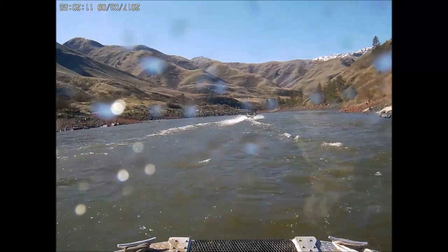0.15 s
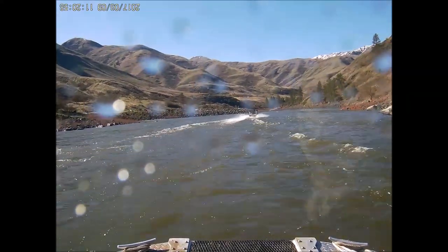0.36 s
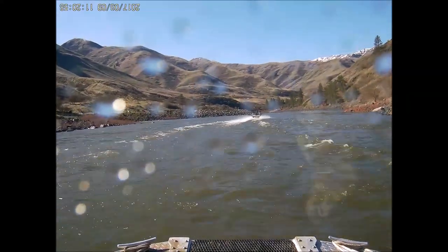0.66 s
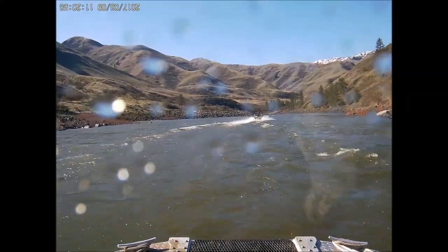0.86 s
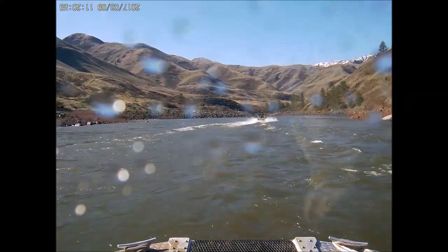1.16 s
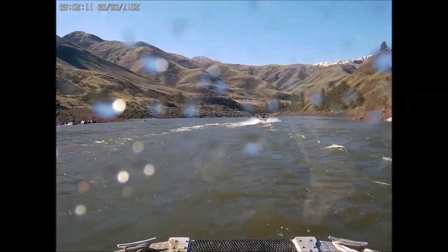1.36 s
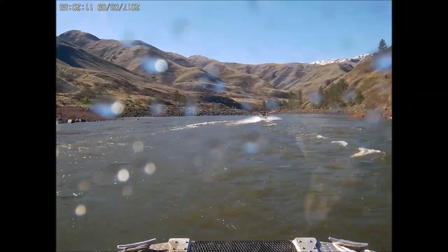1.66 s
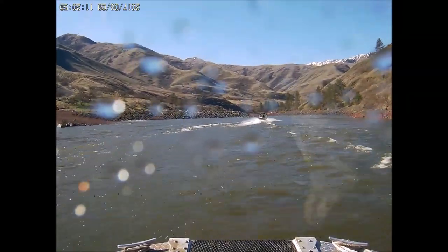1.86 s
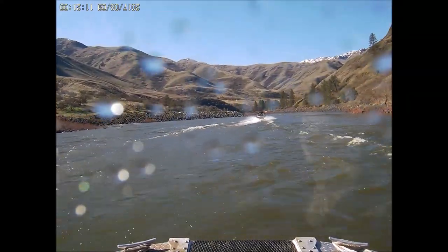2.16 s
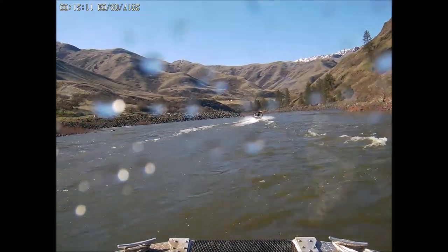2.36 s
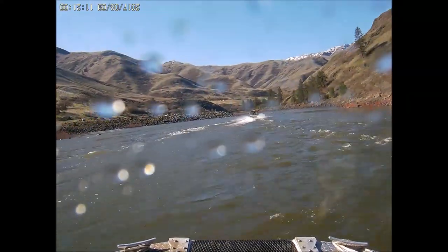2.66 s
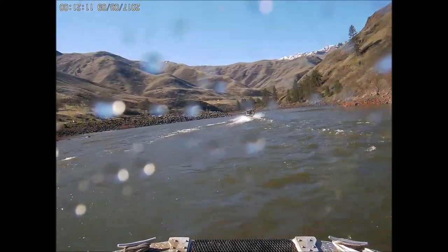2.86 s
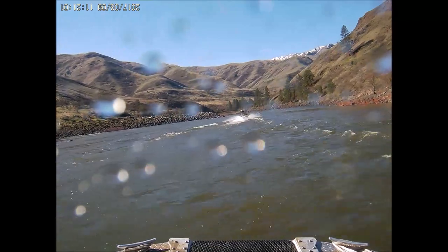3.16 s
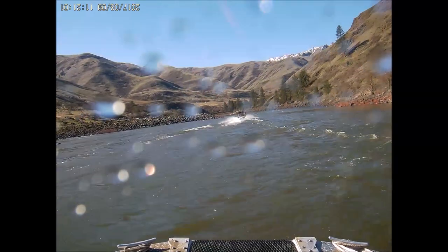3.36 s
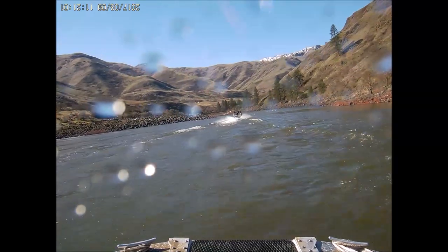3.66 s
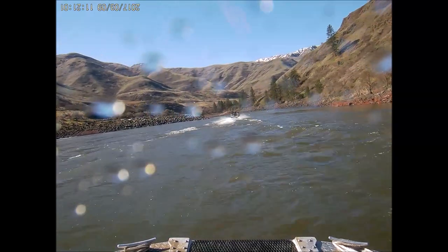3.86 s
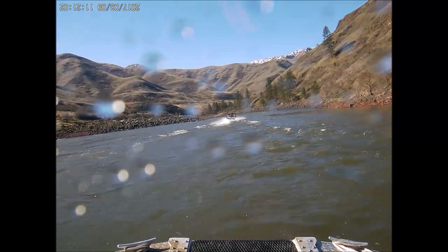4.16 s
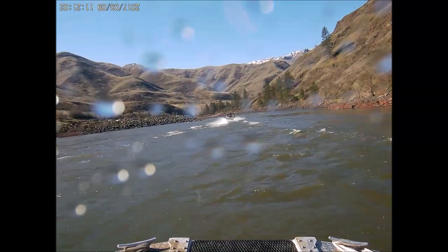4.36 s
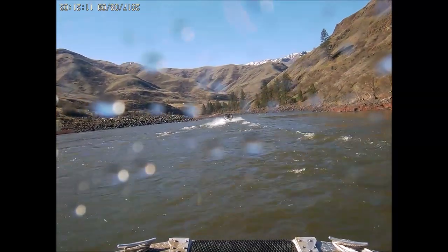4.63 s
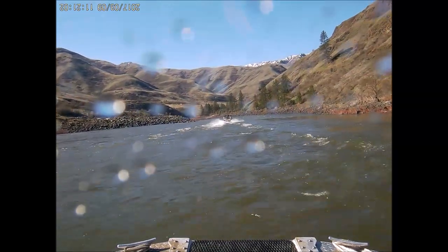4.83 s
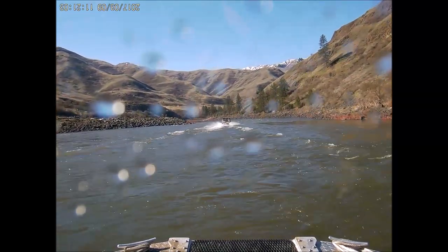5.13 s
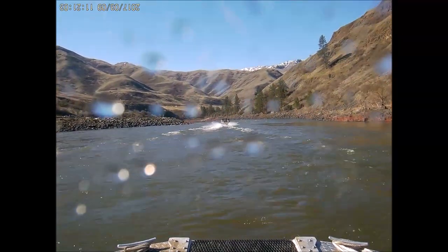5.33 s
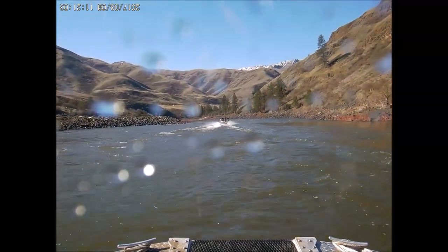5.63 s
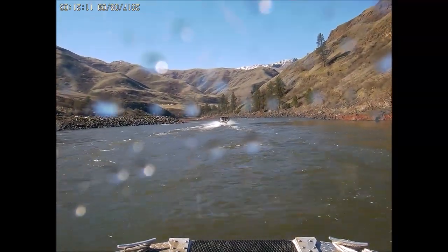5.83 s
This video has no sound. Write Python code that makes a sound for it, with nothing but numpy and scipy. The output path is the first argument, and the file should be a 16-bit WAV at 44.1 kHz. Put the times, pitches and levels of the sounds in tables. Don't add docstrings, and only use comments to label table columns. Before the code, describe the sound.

A boat runs at steady throttle on an open river, heard close from a sealed housing on the bow, so everything is boxy and low-heavy. Throughout, the engine hums as a deep, smooth drone with a buzzy upper edge, its pitch almost fixed; a midrange hum swells from about 2 to 4.5 seconds, and a higher one joins from 3.5. Water rushes continuously, ringing hollowly in the housing, slightly weaker around 1 to 1.5 seconds, with soft leak hiss and spray. From 0 to 2 seconds waves thump the hull rapidly and unevenly; the hardest blows and a cluster of sharp knocks fall at 1.45 to 1.75. More thuds follow at 2.2, 3.0 and 3.3, with scattered ticks. Around 3.5 to 5 it is calmer, then a heavy boom lands at 5.3 with lesser ones after. A very faint electronic whine persists, and treble momentarily vanishes at scattered moments.

```python
import sys
import numpy as np
from scipy import signal
from scipy.io import wavfile
from scipy.ndimage import uniform_filter1d

SR = 44100
rng = np.random.default_rng(int(sys.argv[2]) if len(sys.argv) > 2 else 0)


def output_pcm(signal):
    pcm = np.clip(np.atleast_2d(signal).T, -1, 1) * 32767
    wavfile.write(sys.argv[1], SR, np.round(pcm).astype(np.int16))


def linear_from_db(decibels):
    return 10 ** (np.asarray(decibels, float) / 20)


N = 264159
TIME = np.arange(N) / SR

# (time [s], panel swell [dB], housing swell [dB])
TRIM = [
    (0, -5, 0),
    (1, -10, -7),
    (1.8, -7, -6),
    (2.1, 4, -5),
    (3.2, 4, -5),
    (3.5, 4, 2),
    (4.5, 0, 3),
    (5, -4, 1),
    (5.99, -13, 0),
]
# (time [s], boom level [dB], hold [s], upper plates relative to boom [dB])
WAVES = [(0.0, -22, 0.029, -9), (0.189, -21.5, 0.061, -3.5), (0.316, -24, 0.12, -12),
         (0.488, -29.5, 0.072, 4), (0.63, -22.5, .04, -17), (0.703, -20, 0.06, -8.5),
         (0.872, -22.5, 0.037, -13), (0.938, -20.5, 0.042, -10.5), (1.04, -26.5, 0.053, -9),
         (1.17, -30, 0.24, -3), (1.462, -19, 0.052, -4), (1.668, -13, 0.011, -6), (1.834, -26, 0.1, -7.5),
         (2.107, -29.5, 0.11, 3), (2.186, -18, 0.027, -15), (2.286, -24.5, 0.14, -3.5),
         (2.584, -35.5, 0.18, -4), (2.98, -22.5, 0.095, -8), (3.106, -27, 0.13, -1.5),
         (3.274, -24.5, 0.025, -13), (3.48, -33.5, 0.13, -3.5), (3.795, -38.5, 0.093, 4.5),
         (4.004, -27, 0.053, -5.5), (4.19, -28.5, 0.18, -12), (4.641, -41, 0.18, 5), (4.887, -29, 0.3, -5),
         (5.296, -17, 0.064, -16), (5.38, -23.5, 0.096, -19), (5.542, -27.5, 0.11, -20),
         (5.7, -27, 0.2, -11.5)]
# (frequency [Hz], width [Hz], level [dB])
HOUSING_LOW = [(523.5, 49, -7.5), (614, 87, -8), (688.1, 25.8, 1), (730, 25.7, -2), (809.6, 100, -4),
               (859.6, 94, -5), (941.3, 80, -2.5)]
# (frequency [Hz], width [Hz], level [dB])
HOUSING_HIGH = [(1083, 44, -6), (1175, 67, -3), (1312, 150, -5.5), (1412.5, 65, -4), (1494, 133, -6.5),
                (1749, 98, 1.5), (1866, 63, -6.5)]
# (frequency [Hz], width [Hz], level [dB])
LEAK = [(2060, 165, 6.5), (2407, 146, 0.5), (2738, 146, -1.5), (2970, 134, -1.5)]
# (frequency [Hz], width [Hz], level [dB])
SEAL = [(3230, 630, 2), (4207, 610, 2.5), (5670, 3100, -5.5), (5900, 1400, -12.5), (6920, 790, 1),
        (8310, 1350, -5.5), (9340, 770, -2), (10710, 1300, -1), (11800, 630, -13), (12500, 900, -13),
        (12900, 700, -3), (13900, 500, -9), (14600, 1300, -11), (15400, 800, -5.5)]


def rms_one(x):
    return x / np.sqrt(np.mean(x ** 2) + 1e-20)


def in_time(rows):
    s, *columns = np.transpose(rows)
    return [np.interp(TIME, s, column) for column in columns]


def drift(rate, size=1):
    r = np.exp(-80 * np.pi * rate / SR)
    white = rng.standard_normal(N // 40 + 2002)
    slow = signal.lfilter([1], [1, -2 * r, r * r], white)[2000:]
    return np.interp(np.arange(0, N, size) / 40, np.arange(len(slow)), rms_one(slow))


def resonate(x, hz, width):
    r = np.exp(-np.pi * width / SR)
    feedback = [1, -2 * r * np.cos(2 * np.pi * hz / SR), r * r]
    return signal.lfilter((1 - r * r) / 2 * np.array([1, 0, -1]), feedback, x)


def edge(x, hz, kind, order):
    return signal.sosfilt(signal.butter(order, hz, kind, fs=SR, output="sos"), x)


def band(x, hz, kind):
    return signal.sosfiltfilt(signal.butter(6, hz, kind, fs=SR, output="sos"), x)


def body(drive, modes):
    return sum((-1) ** k * linear_from_db(db) * resonate(drive, hz, width) for k, (hz, width, db) in enumerate(modes))


def turbulence(modes, patchy_db, rate):
    out, white = 0, rng.standard_normal((3, N))
    for k, (hz, width, db) in enumerate(modes):
        patches = np.repeat(linear_from_db(db + patchy_db * drift(rate, size=40)), 40)[:N]
        ring = resonate(white[k % 3] * patches, hz, width)
        out = out + resonate(ring, hz, width * 1.74)
    return rms_one(out)


def steadied(x, seconds, share):
    size = int(seconds * SR)
    swell = uniform_filter1d(uniform_filter1d(x ** 2, size), size)
    return rms_one(x / (swell + 0.025) ** (share / 2))


def slams(start_s, peak_db, hold_s, fall_db_per_s, calm_db):
    rise_s = 0.023
    since = TIME[::32] - start_s[:, None]
    rise = np.sin(np.pi / 2 * np.clip(since / rise_s + .5, 0, 1)) ** 2
    fall_db = fall_db_per_s * np.maximum(since - hold_s[:, None], 0)
    blows = rise * linear_from_db(peak_db[:, None] - fall_db)
    power = linear_from_db(2 * calm_db) + np.sum(blows ** 2, axis=0)
    return np.interp(TIME, TIME[::32], 10 * np.log10(power))


def whine():
    # (frequency [Hz], rms level [dB])
    tones = [(6857, -78.5), (13714, -70.5)]
    out = 0
    for hz, db in tones:
        level = linear_from_db(db + .9 * drift(15)) * np.sqrt(2)
        out = out + level * np.sin(2 * np.pi * hz * TIME + 0.27 * drift(25))
    return out


def flow():
    # (time [s], rush level [dB])
    rush_curve = [(0, -29.5), (.6, -31.5), (1.0, -33.5), (1.4, -33), (1.8, -31.5), (3.3, -31),
                  (3.45, -30.5), (4.5, -29.5), (4.8, -31.5), (5.3, -29.5), (5.99, -30)]
    splash_from_db = -21
    splash_lag_s = 0.0095
    s, boom_db, hold_s, _ = np.transpose(WAVES)
    level_db = slams(s + splash_lag_s, boom_db, .5 * hold_s, fall_db_per_s=250, calm_db=splash_from_db)
    splash = level_db - splash_from_db
    rush_db, = in_time(rush_curve)
    ring_db = -36.5 + 0.52 * (rush_db - rush_db.mean())
    return rush_db + 1.5 + 0.23 * splash, ring_db + 0.13 * splash, -56 + 0.69 * splash, -55.16 + .2 * splash


def water(boom):
    jolt_lag_s = .0025
    low_db, high_db, leak_db, spray_db = flow()
    stroke = rms_one(boom)
    throb = np.clip(-np.roll(stroke, int(jolt_lag_s * SR)), -3, 3)
    shake_db = 20 * np.log10(uniform_filter1d(np.abs(stroke), size=300) + 1.2)
    gust = drift(22.0)

    low = turbulence(HOUSING_LOW, patchy_db=1.3, rate=6.4)
    low = linear_from_db(low_db + .35 * throb + 0.15 * gust) * low
    low += (linear_from_db(0.6 * in_time(TRIM)[1]) - 1) * resonate(low, 700, 60)
    high = edge(turbulence(HOUSING_HIGH, patchy_db=0.0, rate=14.0), 1930, "low", order=4)
    high = linear_from_db(high_db + .8 * throb + 0.9 * gust + 0.3 * shake_db) * high
    leak = turbulence(LEAK, patchy_db=1.0, rate=9.2)
    leak = linear_from_db(leak_db + 0.87 * throb + 2.0 * gust + 0.058 * shake_db) * leak
    spray = edge(turbulence(SEAL, patchy_db=0.8, rate=13), 3880, "high", order=2)
    spray = linear_from_db(spray_db + 0.82 * throb + 0.64 * gust + 0.076 * shake_db) * spray
    return low + high + leak + spray


def widened(modes):
    return [(hz, 2.3 * width, db) for hz, width, db in modes]


def fittings():
    # (time [s], peak level [dB], brightness [dB])
    knocks = [(0.2399, -22, -2), (0.7142, -16, -2), (0.7275, -22, 4), (0.8134, -21, -3), (0.9557, -25, 9),
              (1.1623, -20, -5), (1.4585, -23, -4), (1.4696, -24, -3), (1.4984, -15, 0), (1.5074, -21, 1),
              (1.5397, -22, 1), (1.6800, -13, -1), (1.6984, -21, 2), (1.705, -11, -1), (1.7394, -26, 7),
              (1.9039, -22, -2), (2.163, -23, 1), (2.1894, -24, 2), (2.227, -20, 3), (2.6954, -22, -4),
              (2.9990, -21, 0), (3.1073, -23, 3), (3.156, -20, 0), (3.2909, -22, 2), (3.8157, -24, -3),
              (4.3001, -23, -8), (4.9387, -26, 2), (5.3285, -23, 5), (5.3415, -22, 3), (5.462, -22, 0)]
    s, peak_db, bright_db = np.transpose(knocks)
    dull, bright = np.zeros((2, N + 400))
    puffs = rng.standard_normal((len(s), 300)) * np.exp(-np.arange(300) / SR / .0006)
    puffs[:, 0] = 5
    for at, db, tilt_db, puff in zip((s * SR).astype(int), peak_db, bright_db, puffs):
        dull[at:at + 300] += linear_from_db(db) * rms_one(puff)
        bright[at:at + 300] += linear_from_db(db + tilt_db) * rms_one(puff)
    low = linear_from_db(14) * body(dull, widened(HOUSING_LOW)) + linear_from_db(7.5) * body(dull, widened(HOUSING_HIGH))
    low = edge(low, 1900, "low", order=6)
    high = linear_from_db(-19) * edge(body(bright, LEAK), 1600, "high", order=2) + linear_from_db(-30) * body(bright, SEAL)
    return (low + high)[:N]


def hull():
    # (frequency [Hz], width [Hz], level [dB])
    long_plates = [(27, 11, -42), (40, 7.4, -13), (62, 4.4, 4.5), (73.46, 8.3, 0.5)]
    # (frequency [Hz], width [Hz], level [dB])
    upper_plates = [(102, 8.8, -0.5), (124.9, 5, -7.5), (141.2, 9, -13.5), (174, 40, -17.5)]
    # (frequency [Hz], width [Hz], level [dB])
    deck_panels = [(223, 72, -4.5), (312.8, 83, -0.5), (371, 58, -11.5), (459.7, 26, 1)]
    s, boom_db, hold_s, upper_db = np.transpose(WAVES)
    low = steadied(turbulence(long_plates, patchy_db=1.5, rate=8), .03, share=.65)
    high = steadied(turbulence(upper_plates, patchy_db=1.5, rate=8), .03, share=.4)
    deck = turbulence(deck_panels, patchy_db=2.0, rate=4.7)
    low = linear_from_db(slams(s, boom_db, hold_s, fall_db_per_s=280, calm_db=-39.5)) * low
    high = linear_from_db(slams(s, boom_db + upper_db, hold_s, fall_db_per_s=116, calm_db=-39)) * high
    return low + high + linear_from_db(-39) * deck


def engine():
    # (time [s], cycle rate [1/s])
    speed = [
        (0, 24.67),
        (2, 24.71),
        (5.3, 24.72),
        (5.99, 24.8),
    ]
    # (multiple of the cycle rate [1], level [dB])
    orders = [(1, -26), (2, -4), (3, -1), (4, -4.5), (5, -14), (6, -9), (7, -14), (8, -8), (9, -14.5),
              (10, -14.5), (11, -28), (12, -18), (13, -8.5), (14, -19.5), (15, -27.5), (16, -17), (17, -22),
              (18, -19.5), (19, -17), (20, -18), (21, -20), (22, -17), (23, -22), (24, -13), (25, -13),
              (26, -18.5), (27, -16), (28, -7), (29, -8.5), (30, -9.5)]
    engine_db = -34.5
    thin = 8
    cycles = np.cumsum(in_time(speed)[0])[::thin] / SR
    panel_db, housing_db = in_time(TRIM)
    swell = {13: panel_db[::thin], 28: housing_db[::thin]}
    out = 0
    for order, db in orders:
        wobble = 0.0066 * order * drift(4.1, size=thin) + rng.uniform(0, 2 * np.pi)
        level_db = db + engine_db + swell.get(round(order), 0) + 0.61 * drift(0.95, size=thin)
        out = out + linear_from_db(level_db) * np.sqrt(2) * np.sin(2 * np.pi * round(order) * cycles + wobble)
    return signal.resample_poly(out, thin, 1)[:N]


def scene():
    boom = hull() + engine()
    stroke = edge(boom, 150, "low", order=2)
    slap = .9 * edge(stroke ** 2, 27, "high", order=2)
    return (boom - slap + water(stroke) + fittings())[None]


def lose_treble(x):
    # (low end [Hz], high end [Hz], band width [Hz], share of time lost [1])
    flickers = [(3100, 6400, 260, .055), (7500, 8300, 260, .04), (11500, 13400, 350, .08),
                (13950, 15000, 350, .3), (15000, 15800, 400, .08)]
    # (time [s], lost above [Hz], share spared near 7 kHz [1], share of whine spared [1])
    holes = [(.374, 3300, 0, 1), (.524, 2400, 1, 1), (.842, 2100, 1, 1), (1.483, 2500, .8, 0),
             (1.69, 13000, 0, 0), (2.293, 3000, 1, 1), (3.045, 3200, 0, 0), (3.681, 2400, 1, 0),
             (3.978, 2400, 1, 0), (4.235, 2400, 0, 1), (5.109, 2500, .6, 1), (5.879, 3300, 0, 1)]
    hz, _, frames = signal.stft(x, SR, nperseg=1024)
    common = rng.standard_normal(frames.shape[-1])
    for low_hz, high_hz, width, share in flickers:
        for start in np.arange(low_hz, high_hz, width):
            chance = uniform_filter1d(.4 * common + rng.standard_normal(len(common)), size=2)
            frames[:, (hz >= start) & (hz < start + width)] *= chance < np.quantile(chance, 1 - share)
    out = signal.istft(frames, SR, nperseg=1024)[1][:, :N]
    for s, above_hz, spared, whine_spared in holes:
        near = slice(int((s - .05) * SR), int((s + .05) * SR))
        top = band(out[:, near], above_hz, "high")
        kept = spared * band(top, [6500, 7400], "band")
        kept = kept + whine_spared * band(top, [13000, 14300], "band")
        fade = np.sin(np.pi / 2 * np.clip(2.1 - np.abs(TIME[near] - s) / .0045, 0, 1)) ** 2
        out[:, near] -= (.96 - .14 * spared) * fade * (top - kept)
    return out


def roll_off(x):
    return signal.sosfilt(signal.butter(12, 15720, fs=SR, output="sos"), x)


def record(dry):
    rounded = 0.49 * np.tanh(dry / 0.6)
    mix = lose_treble(rounded + whine())
    return roll_off(mix)


dry = scene()
out = record(dry)
output_pcm(out)
```